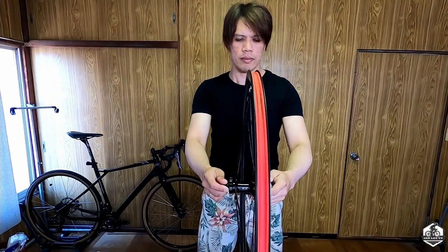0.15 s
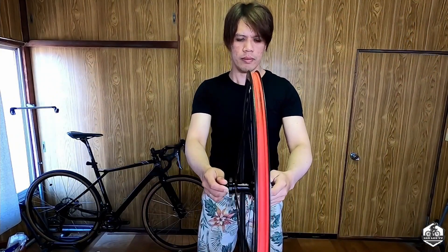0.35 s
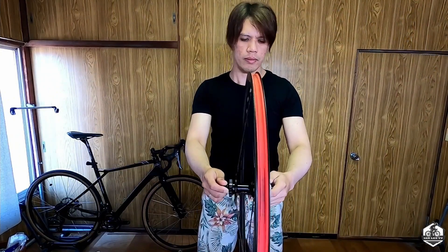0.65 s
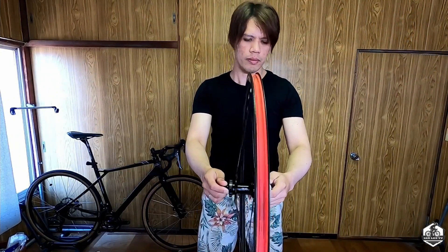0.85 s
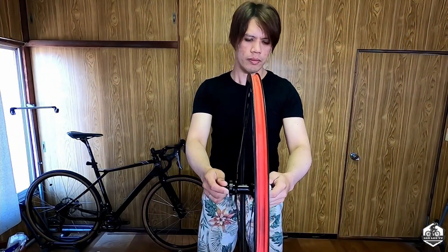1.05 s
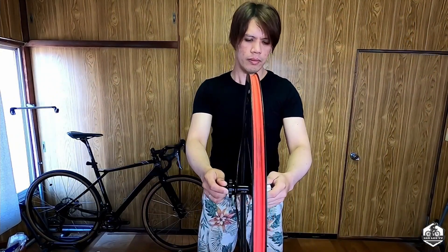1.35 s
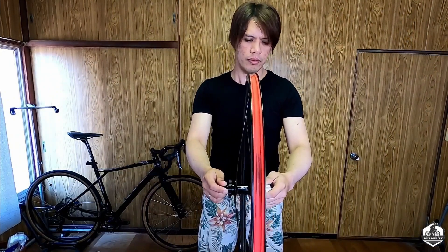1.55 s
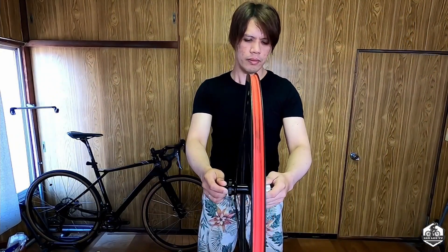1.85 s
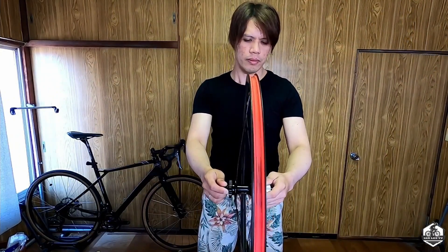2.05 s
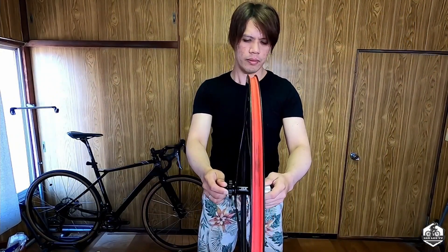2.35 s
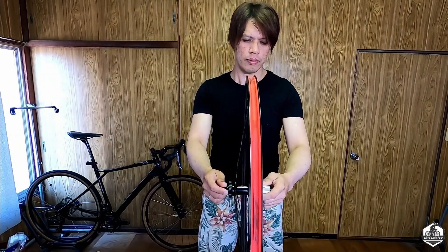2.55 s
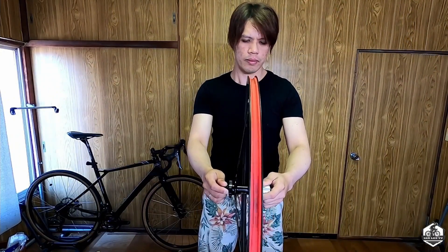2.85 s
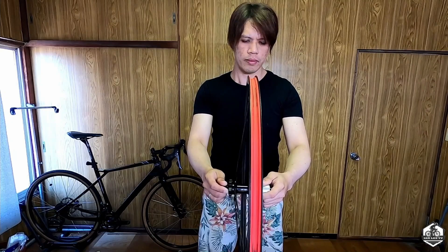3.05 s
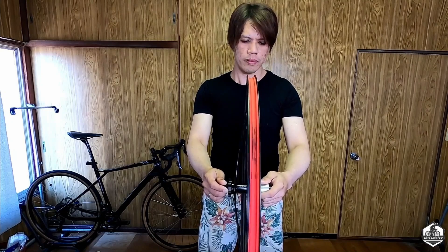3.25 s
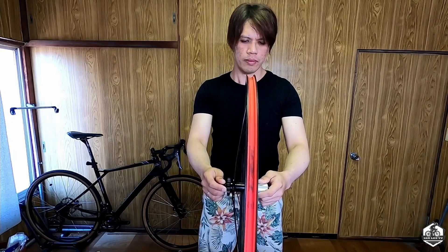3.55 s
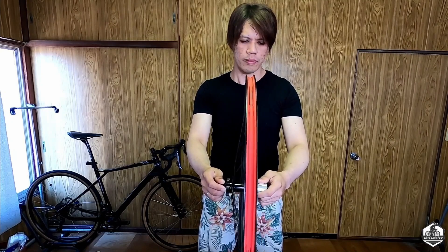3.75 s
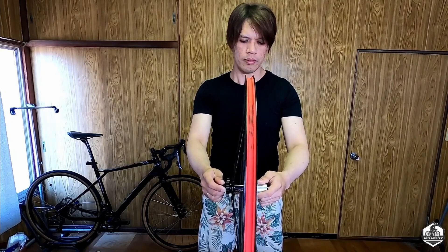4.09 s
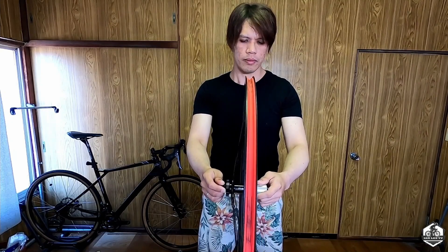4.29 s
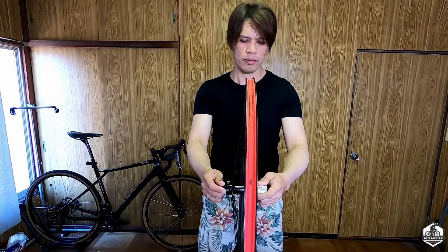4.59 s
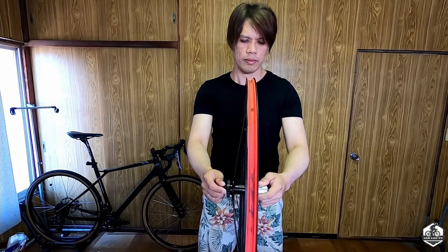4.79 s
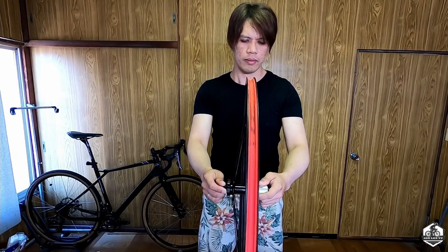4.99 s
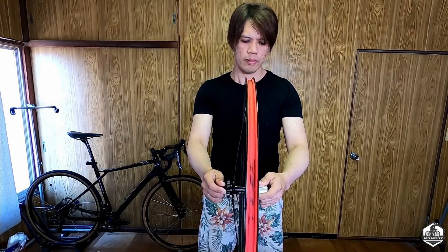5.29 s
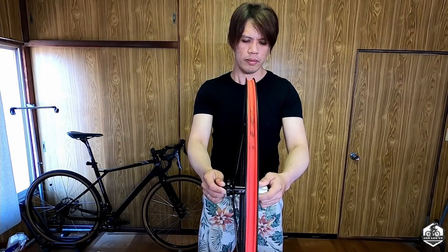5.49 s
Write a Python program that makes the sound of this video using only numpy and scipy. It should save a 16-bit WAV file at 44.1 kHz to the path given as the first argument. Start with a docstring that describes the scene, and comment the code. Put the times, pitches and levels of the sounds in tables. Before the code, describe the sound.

A coasting bicycle wheel ticks in a fast, bright, continuous buzz that slows slightly, in a small room with a faint hum.

```python
"""A bicycle rear wheel, held by its axle, coasts close to a stereo pair in a small panelled room.
From the start the pawls snap down at every ratchet tooth, about 65 a second; hub, spokes and hollow
rim ring, and the walls throw each click back. The ticking slows unevenly with the unbalanced rim,
a few clicks standing out, and is still going at the end, over a low room hum."""
import sys
import numpy as np
from scipy import signal
from scipy.fft import rfft, irfft
from scipy.io import wavfile
from scipy.ndimage import uniform_filter1d

SR = 44100
rng = np.random.default_rng(int(sys.argv[2]) if len(sys.argv) > 2 else 0)


def master(y):
    """Save y as 16-bit WAV."""
    cut = np.clip(np.atleast_2d(y).T, -1, 1)
    pcm = np.round(cut * 32767)  # scale
    wavfile.write(sys.argv[1], SR, pcm.astype(np.int16))


N = 248272


def amp(db):
    return 10 ** (np.asarray(db) / 20)


def unit_rms(x):
    return x / np.sqrt(np.mean(x ** 2) + 1e-20)


def curve_at(points, hz):
    f, value = np.transpose(points)
    return np.interp(np.log(hz + 1), np.log(f + 1), value)


def impulses(at, size):
    return np.bincount(np.clip(np.round(at * SR).astype(int), 0, N - 1).ravel(), size.ravel(), N)


def minimum_phase(points, size=2048):
    """Impulse response of energy 1 with the given spectrum."""
    level_db = curve_at(points, abs(np.fft.fftfreq(size, 1 / SR)))
    log_gain = np.log(amp(np.maximum(level_db, -80)))
    taps = np.fft.ifft(np.exp(log_gain - 1j * signal.hilbert(log_gain).imag)).real[:size // 2]
    return taps / np.linalg.norm(taps)


# Clicks that stand out, against a usual one: t/s, blow level/dB, hub shell ping level/dB
ACCENTS = [(0.093, 1.9, 2), (0.512, 2, -4), (0.684, 0, 0.8), (0.895, 0.5, -16), (0.948, 2.9, -7),
           (1.197, 2.1, 3), (1.251, 0.5, 3.5), (1.472, 0.5, 3.4), (1.787, 2.5, -3), (1.85, 3.5, -0.3),
           (2.087, 0, 6), (2.109, 2.4, -1), (2.175, 0.0, 8), (2.399, 2.5, -9), (2.693, 2.5, -5),
           (2.716, -0.5, -5), (2.762, 0.2, 5), (2.785, -1, 4.0), (2.831, -0.2, 7.5), (2.878, 1, 8),
           (3.306, 0, 5.6), (3.719, -0.5, 6), (3.883, 2, -3), (3.985, -1, 6), (4.123, 0.1, 7.5),
           (4.229, 3, 2), (4.407, 2.5, -14), (4.442, 2, -4), (4.767, 2.5, 1), (4.878, 4.5, -17),
           (5.225, 3.5, 3.8), (5.438, 1.5, -6), (5.484, 0, 5.5)]
def freehub(teeth=72, start_teeth_per_s=64.3538, drag=16.6185, drag_easing=.000455):
    """Snap and ring, one click a tooth; drag takes a little off the speed squared at each."""
    step = .05  # teeth
    tooth = np.arange(0, 236, step)
    imbalance = 161.8 * np.cos(2 * np.pi * (tooth - 5.25) / teeth)  # heavy spot lowest at tooth 5.25
    speed = np.sqrt(start_teeth_per_s ** 2 - drag * tooth + drag_easing * tooth ** 2 + imbalance)
    at = (.0003 + np.cumsum(step / speed))[::20]
    at = at[at < N / SR]
    usual_db = -25 - .05 * at
    click_db = usual_db + .54 * rng.standard_normal(len(at))
    accent_s, blow_db, ping_db = np.transpose(ACCENTS)
    accented = abs(at - accent_s[:, None]).argmin(1)
    click_db[accented] = usual_db[accented] + blow_db
    snap = pawl_snap(at, amp(click_db), accented, blow_db)
    ring = wheel_ring(at, amp(click_db), accented, blow_db, amp(usual_db[accented] + ping_db))
    low_cut = signal.butter(4, 1200, "high", fs=SR, output="sos")  # so small a source radiates no bass
    return signal.sosfilt(low_cut, [snap, ring])


# Colour of the snap, close to the hub: f/Hz, relative level/dB
SNAP_SPECTRUM = [(700, -60.5), (1300, -36), (1900, -21), (2700, -18), (4450, -18.5), (6200, -10.5),
                 (7200, -6), (8200, -4.5), (9200, -6), (9800, -6.5), (10400, -11.5), (10900, -18),
                 (12500, -22), (13800, -14), (15000, -24), (16000, -17)]
def pawl_snap(at, size, accented, blow_db, count=45, split_hz=7000):
    """The pawls land and chatter for a few milliseconds; a harder blow lands more tightly."""
    shape = len(at), count
    delay = .0015 * rng.exponential(1, shape) + .003 * rng.exponential(1, shape)
    delay *= amp(1.8 * rng.standard_normal((len(at), 1)))  # tight or loose landings
    delay[accented] *= amp(-.8 * blow_db)[:, None]
    hits = rng.standard_normal(shape)
    hits *= size[:, None] / np.linalg.norm(hits, axis=1, keepdims=True)
    landings = np.zeros(N)
    for side, spread in ("high", .7), ("low", 1.5):  # the tips land tightly, the lower chatter drags on
        band = signal.butter(2, split_hz, side, fs=SR, output="sos")
        landings += signal.sosfilt(band, impulses(at[:, None] + spread * delay - .0004, hits))
    return amp(31.5) * signal.oaconvolve(landings, minimum_phase(SNAP_SPECTRUM))[:N]


# Modes of hub, spokes and rim: f/Hz
MODE_HZ = [1060, 1140, 1370, 1440, 1785, 2131, 2169, 2337, 2367, 2580, 2901, 2962, 3130, 3273, 3385, 3640,
           3810, 4024, 4200, 4740, 4940, 5250, 5590, 6050, 6950, 7147, 7359, 7891, 8760, 9352]
# Their damping and strength, in the same order: width/Hz, relative level/dB
MODE_WIDTH_LEVEL = [(24.2, -23.5), (30, -28), (30.7, -22.5), (26.7, -19), (25.4, -15), (14.9, -13.5),
                    (16.3, -10.5), (14.6, -9.5), (14.7, -9.5), (41.7, -22), (19.6, -8.5), (17.9, -13.5),
                    (59.7, -12), (25, -13), (25, -28), (90, -1), (70, -10), (40, -9), (103, -2),
                    (119, -3.5), (38, -10.5), (149, -3), (104, 0), (90, -8), (150, -0.5), (55, -1.5),
                    (90, -17), (90, -14), (200, 10), (100, 9.5)]
def wheel_ring(at, size, accented, blow_db, shell_ping):
    """Each click rings the wheel's damped modes in another mix."""
    t, out = np.arange(SR // 6) / SR, np.zeros(N)
    for hz, (width, db) in zip(MODE_HZ, MODE_WIDTH_LEVEL):
        drive = size * amp(2.8 * np.clip(rng.standard_normal(len(at)), -2, 2))
        if 3500 < hz < 4300:  # hub shell
            drive[accented] = shell_ping
        if hz > 8000:  # a harder blow rings the top modes more
            drive[accented] = size[accented] * amp(1.2 * blow_db)
        start = at + .004 * rng.random(len(at))  # any landing may set the mode off
        ring = np.sqrt(width / SR) * np.exp(-np.pi * width * t) * np.sin(2 * np.pi * hz * t)
        ring *= 1 - np.exp(-t / .00024)  # the blow spreads along the spokes
        out += amp(db + 27) * signal.oaconvolve(impulses(start, drive), ring)[:N]
    return out


# Reverberation of the panelled room: f/Hz, T60/s
ROOM_DECAY = [(1000, 0.53), (2600, 0.32), (5000, 0.3), (8500, 0.14), (11500, 0.13), (15000, 0.12)]
def wall_reflections(source, path_sets=9, sets_per_s=7, width=.05):
    """Sparse echoes die band by band, nearly alike at both microphones; paths shift as the wheel turns."""
    turn = np.arange(N) / SR * sets_per_s
    slots = np.arange(130, SR // 2 - 12, 12)
    out = np.zeros((2, N))
    for k in range(path_sets):
        taps = np.zeros((2, SR // 2))
        arrivals = slots + rng.integers(0, 12, (2, len(slots)))
        np.put_along_axis(taps, arrivals, rng.choice([-1., 1.], arrivals.shape), 1)
        hz, t, bands = signal.stft(taps, SR, nperseg=128)
        decay = amp(-60 * t / curve_at(ROOM_DECAY, hz)[:, None])
        mid, side = signal.istft(bands * decay, SR, nperseg=128)[1]
        tails = np.array([mid + width * side, mid - width * side]) / np.linalg.norm(mid)
        crossfade = np.sin(np.pi / 2 * np.minimum((turn - k) % path_sets, 2))
        out += signal.fftconvolve((source * crossfade)[None], tails, axes=1)[:, :N]
    return out


# Room tone at the microphones: f/Hz, relative level/dB
HUM_SPECTRUM = [(20, -38), (28, -11), (42, -11), (62, -11.5), (140, -25.5), (185, -25.5), (220, -15),
                (250, -24.5), (265, -19.5), (320, -28.5), (490, -27), (800, -30), (1400, -34), (2200, -120)]
def room_hum(likeness=.98, level_db=-48, fade_db_per_s=.31):
    """Low hum and hiss, almost the same left and right, sinking slightly."""
    left, other = rng.standard_normal((2, N))
    pair = np.array([left, likeness * left + np.sqrt(1 - likeness ** 2) * other])
    colour = amp(curve_at(HUM_SPECTRUM, np.fft.rfftfreq(N, 1 / SR)))
    return amp(level_db - fade_db_per_s * np.arange(N) / SR) * unit_rms(irfft(rfft(pair) * colour, N))


# Swells under the hum: middle t/s, length/s, level/dB
SHUDDER_SWELLS = [(0.184, 0.17, -39.5), (.55, 0.3, -40), (0.99, 0.49, -35.5), (1.52, 0.11, -40),
                  (2.063, 0.22, -38.5), (2.34, 0.25, -38), (2.747, 0.38, -40), (3.095, .3, -37),
                  (3.597, 0.69, -39), (4.21, 0.4, -31), (4.823, 0.58, -34), (5.5, 0.32, -39)]
def shudder():
    """A wandering tone at the lower edge of hearing comes and goes."""
    t = np.arange(N) / SR
    hz = 17 + 2.51 * unit_rms(uniform_filter1d(rng.standard_normal(N), 6000))
    swells = sum(amp(db) * np.exp(-(2 * (t - s) / length) ** 2) for s, length, db in SHUDDER_SWELLS)
    return swells * np.sqrt(2) * np.sin(2 * np.pi * np.cumsum(hz) / SR)


def scene():
    """The wheel centred between the microphones, the room behind it."""
    snap, ring = freehub()
    return snap + ring + wall_reflections(snap + amp(-1.5) * ring) + room_hum() + shudder()


def record(dry, threshold_db=-19.5, release_db_per_s=120, cutoff_hz=15720):
    """After the microphones, a quick limiter leans on the loudest clicks; then a low-pass."""
    power_db = 10 * np.log10(abs(uniform_filter1d((dry ** 2).mean(0), 90)) + 1e-12)
    release = np.arange(N) * release_db_per_s / SR
    peak_db = np.maximum.accumulate(power_db + release) - release
    over_db = np.maximum(peak_db - threshold_db, 0)
    limited = dry / amp(.35 * uniform_filter1d(over_db, 60))
    low_pass = signal.firwin(511, cutoff_hz, window=("kaiser", 9), fs=SR)
    return signal.oaconvolve(limited, low_pass[None], "same")


dry = scene()
out = record(dry)
master(out)
```